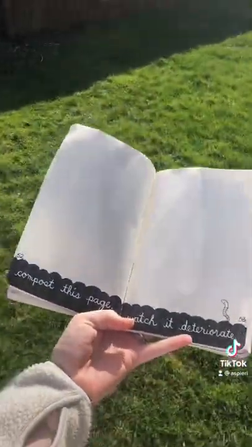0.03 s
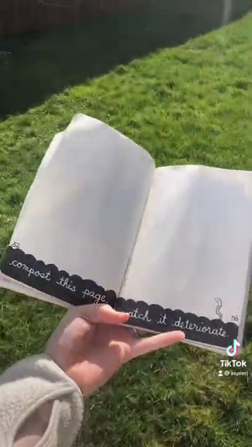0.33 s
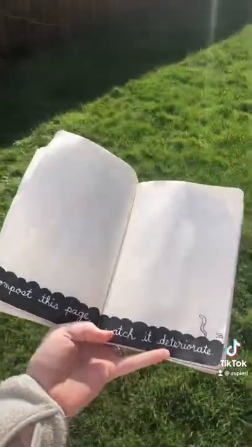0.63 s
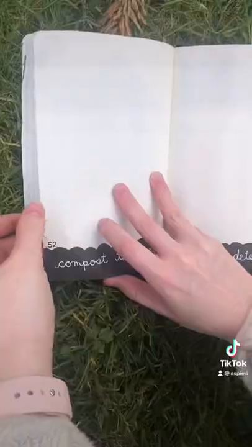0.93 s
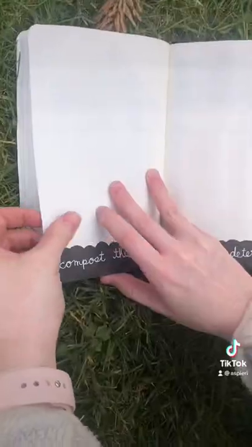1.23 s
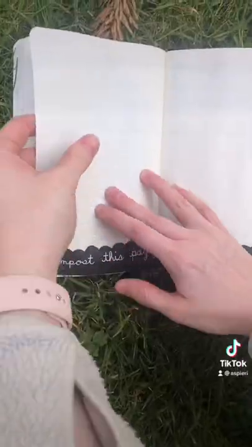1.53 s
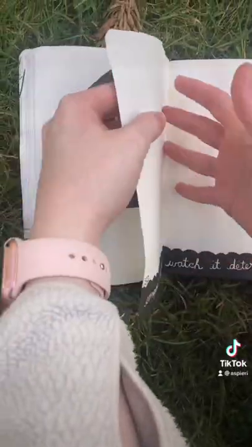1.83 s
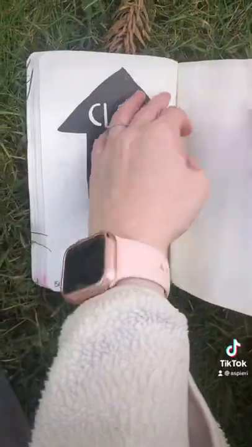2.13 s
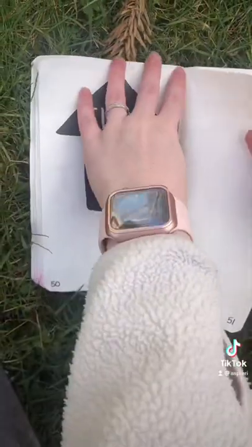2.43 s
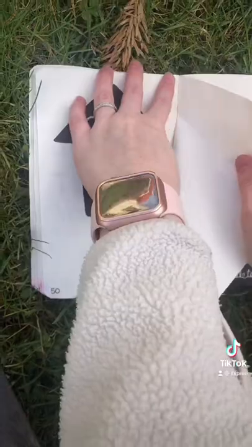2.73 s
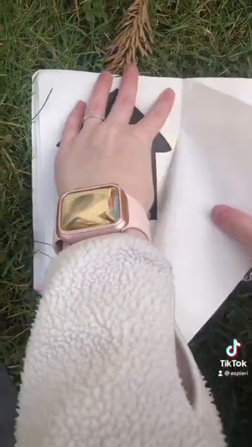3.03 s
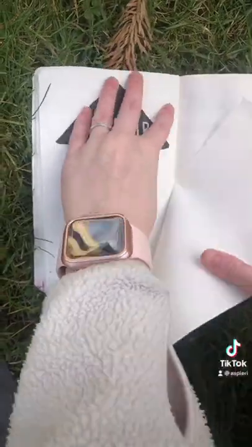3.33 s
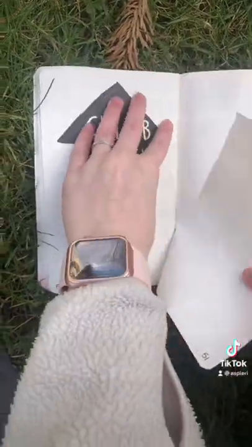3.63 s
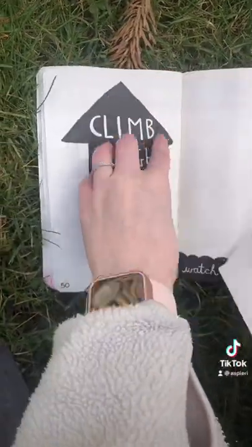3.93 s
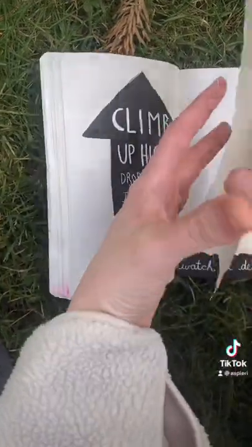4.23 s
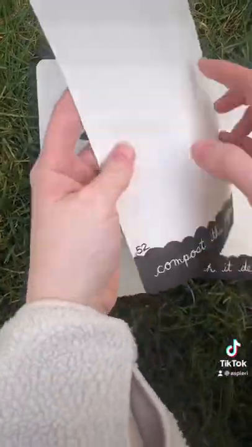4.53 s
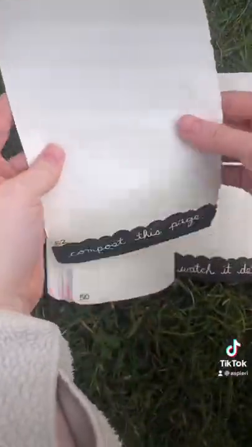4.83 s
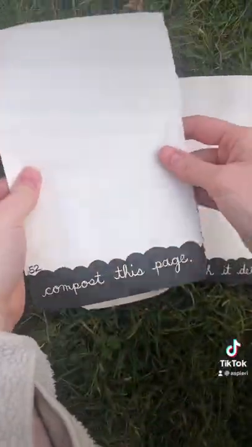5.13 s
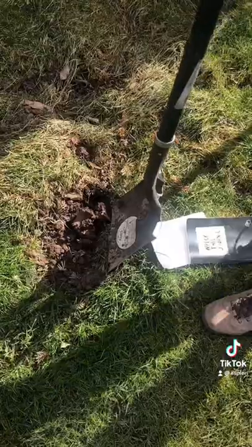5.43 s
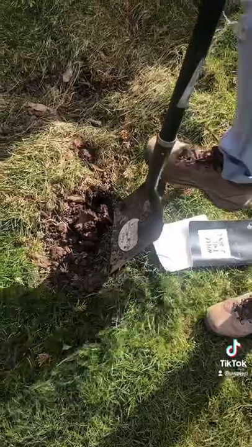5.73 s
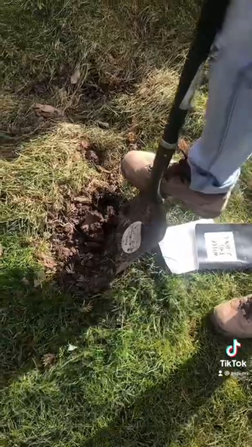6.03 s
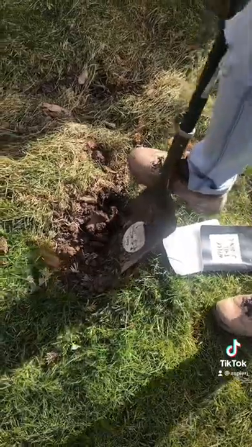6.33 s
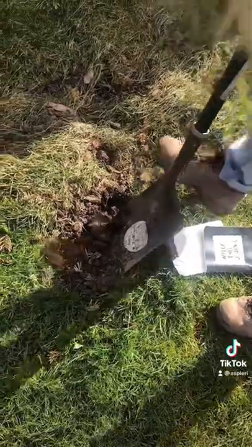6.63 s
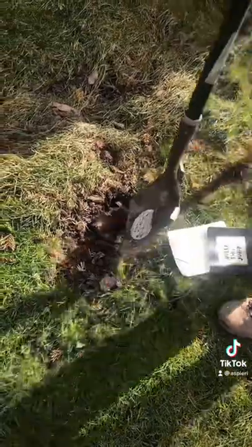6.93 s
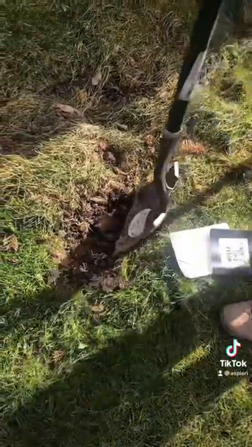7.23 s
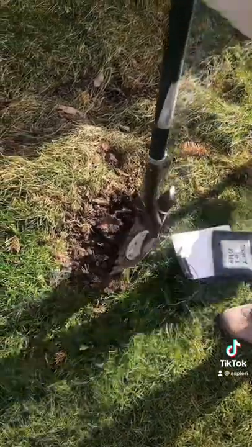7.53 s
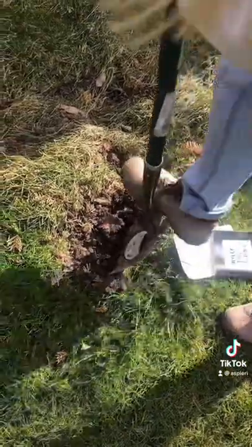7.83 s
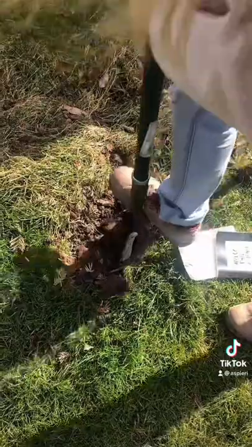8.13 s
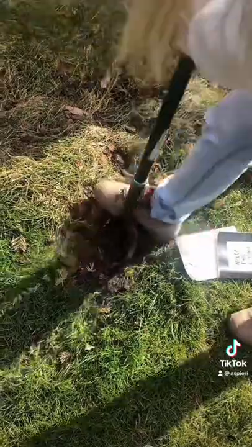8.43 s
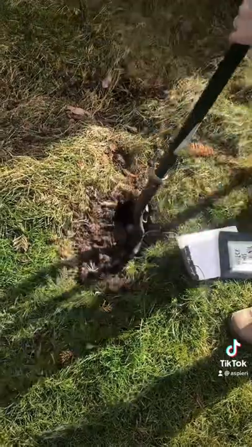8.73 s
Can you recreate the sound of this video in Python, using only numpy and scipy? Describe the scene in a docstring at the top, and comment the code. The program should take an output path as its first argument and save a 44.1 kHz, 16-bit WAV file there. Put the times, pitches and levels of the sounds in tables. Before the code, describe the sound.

Wind rumbles on the microphone over faint garden air, cutting out briefly just before 1 second. It returns with its strongest buffeting from about 1.1 to 2 seconds, while hands softly rub an open notebook and turn a page close by. Between 2.5 and 3.9 seconds the page is ripped out in three pulls, with small paper cracks under continuing gusts. The loose sheet then slides and flexes, snapping most sharply near 4.9 seconds. After a short silence at about 5.3 seconds, the wind is much quieter. A boot knocks on a spade near 5.8 seconds, followed by soft scuffs in grass, a very faint steel ring and snapping roots. Another knock comes at 7.8 seconds, and the blade crunches into the turf with crackling soil until about 8.4 seconds, as low gusts come back through to the end at 9 seconds.

```python
"""Wind buffets the microphone over faint garden air, in three passages parted by silence.
Hands rub an open notebook; a page is turned, ripped out in three pulls and flexed so that it snaps.
Friction makes the rasp, breaking fibres the rip, and sudden buckling the snaps. Then a boot treads
a spade into turf: impacts knock, the steel rings faintly, and soil and roots crackle as they fracture."""
import sys
import numpy as np
from scipy import signal
from scipy.fft import rfft, irfft
from scipy.io import wavfile
from scipy.ndimage import uniform_filter1d, minimum_filter1d, map_coordinates

SR = 44100
rng = np.random.default_rng(int(sys.argv[2]) if len(sys.argv) > 2 else 0)


def dump(signal):
    """Clip the signal to [-1, 1] and save it as 16-bit WAV at the path in sys.argv[1]."""
    limited = np.clip(np.atleast_2d(signal).T, -1, 1)
    pcm = np.round(limited * 32767).astype(np.int16)
    wavfile.write(sys.argv[1], SR, pcm)


N = 396018

# audible passages: start/s, end/s
PASSAGES = [(0, .869), (1.086, 5.234), (5.468, 9)]
# air flow underlying the gusts: t/s, level/dB
BREEZE_LEVELS = [(0, -43), (.85, -42), (1.2, -12), (2.05, -28.5), (3.1, -34), (5.2, -33), (5.47, -45),
                 (6.4, -52.5), (7.3, -43), (8.95, -41)]
# gusts: t/s, length/s, level/dB, relative level of small eddies/dB
WIND_GUSTS = [(0, 0.057, -34.5, -17.5), (0.227, 0.12, -19.5, -19), (.33, 0.3, -24.5, -14),
              (0.535, .13, -20, -18.5), (0.713, 0.15, -22.5, -28), (1.075, 0.12, -8.5, -20),
              (1.214, 0.24, -8.5, -13.5), (1.589, .25, -12.5, -14.5), (1.864, 0.081, -14.5, -17.5),
              (2.142, 0.035, -16, -27), (2.324, 0.33, -14, -20.5), (2.532, 0.41, -15.5, -23.5),
              (3.202, 0.081, -20.5, -21.5), (3.372, 0.039, -23.5, -20), (3.46, 0.037, -19, -23),
              (3.704, 0.039, -12, -25), (3.906, 0.052, -13, -17), (4.051, 0.042, -20.5, -21),
              (4.199, 0.2, -24.5, -39), (4.536, 0.043, -17.5, -28), (4.621, 0.048, -13, -23),
              (4.721, 0.21, -15, -21), (4.984, 0.24, -17, -23), (5.446, 0.089, -35, -28),
              (5.83, 0.2, -41, -32), (7.07, 0.07, -26.5, -48), (7.368, 0.31, -36, -42),
              (7.615, 0.087, -22.5, -39), (7.779, 0.026, -20.5, -39), (7.932, 0.021, -33.5, -31),
              (8.117, 0.046, -28.5, -25), (8.207, 0.15, -20, -34), (8.759, 0.045, -17, -24.5),
              (8.823, .15, -28, -24)]
# sudden puffs of air: t/s, level/dB, relative sputter/dB
AIR_PUFFS = [(1.086, -3.5, -21.5), (1.255, 0.5, -9), (1.299, -3.5, -23.5), (1.382, -5, -17.5),
             (1.417, -3, -14), (1.467, -2, -2), (1.572, -10.5, -12), (1.609, -4, -18), (1.76, -12, -12),
             (1.798, -4, -24), (1.919, -12, -7), (2.152, -11, -15.5), (2.295, -17.5, -20),
             (2.322, -8.5, -22), (3.715, -26, -3.5), (4.636, -6.5, -10.5), (4.799, -10, -24),
             (5.148, -20.5, -27)]
# hands and pages sliding over paper: t/s, length/s, rasp/dB, relative hiss/dB
PAPER_SLIDES = [(0.34, 0.14, -69, 4), (0.83, 0.067, -56, 0.5), (1.102, .14, -58.5, -4.5),
                (1.3, 0.37, -63, 3), (1.762, 0.021, -50, 3), (1.868, 0.14, -53, -6.5),
                (2.08, 0.077, -47.5, -9.5), (2.306, 0.041, -52, -4.5), (2.793, 0.21, -57, -7),
                (3.265, 0.12, -51, -2.5), (3.36, 0.19, -56, -4), (3.88, 0.38, -51.5, -3.5),
                (4.271, 0.093, -45, -4.5), (4.392, 0.19, -51, -1.5), (4.625, 0.018, -40.5, -1.5),
                (4.71, 0.29, -53.5, -0.5), (5.016, 0.12, -58.5, -4), (5.121, 0.045, -50, -2)]
# strokes of page on page: midpoint t/s, length/s, level/dB, f/Hz
PAGE_SWISHES = [(.43, 0.31, -61.5, 10550), (1.554, .14, -53, 2630), (1.99, 0.11, -54, 2300),
                (2.127, .08, -47, 1590), (4.043, 0.045, -53.5, 10900), (4.229, 0.1, -68, 2600),
                (4.467, .1, -59.5, 8040)]
# folds popping through: t/s, level/dB, relative crack/dB, f/Hz
SHEET_SNAPS = [(1.1895, -21.5, -11, 1030), (1.8644, -31.5, -18, 1110), (1.8944, -22.5, -47, 1070),
               (2.264, -20.5, -9, 1645), (2.364, -24, -11, 1500), (2.5482, -30, -4, 1050),
               (2.603, -30, 6, 1300), (2.6433, -30.5, -20, 1090), (2.668, -30, 0.5, 1050),
               (2.6898, -31.5, 8.5, 1380), (2.728, -26, -0.5, 1220), (2.7476, -28.5, 1, 1110),
               (2.86, -33.5, -24, 1310), (2.9145, -30, -23, 1010), (2.9777, -23, -28, 1070),
               (3.005, -32.5, -21, 1400), (3.071, -16, -28, 970), (3.0872, -26, -12, 1150),
               (3.2236, -32, -22, 1120), (3.4925, -22.5, -4.5, 1030), (3.7691, -25, -13.5, 1510),
               (3.8556, -22, -8.5, 2920), (3.8704, -26, -10.5, 3100), (4.2974, -24.5, 4, 1156),
               (4.325, -24, -14, 1420), (4.3585, -26, -18, 1270), (4.5357, -24.5, -16, 1810),
               (4.5438, -20, -8, 1550), (4.6098, -29.5, -8, 1130), (4.8108, -24, -34, 1530),
               (4.8607, -20.5, -27, 1030), (4.873, -25, -14.5, 1110), (4.8908, -11.5, -15, 1650),
               (4.9396, -16, -20, 1250), (4.9755, -19.5, -2, 1680), (5.018, -30, -24, 1030),
               (5.0318, -36, -2, 1820)]
# tugs tearing along the spine: t/s, length/s, sheet/dB, fibres/dB, fade over the tug/dB
PAGE_TUGS = [(2.537, 0.015, -52.5, -52, 2), (2.566, 0.054, -47.5, -49.5, 0.5), (2.649, 0.14, -46, -52.5, 3),
             (2.774, 0.08, -50.5, -61, 3.5), (3.034, .03, -54, -57.5, -3.5), (3.056, 0.17, -34, -40, 9.5),
             (3.505, 0.38, -40, -37, 0.5), (3.841, 0.027, -32.5, -36.5, -5)]
# boots and blade scuffing grass: t/s, length/s, starting level/dB
GRASS_SCUFFS = [(5.438, 0.025, -57.5), (5.796, 0.099, -57.5), (5.9, .15, -68.5), (6.046, 0.107, -57.5),
                (6.165, .36, -57), (6.583, 0.024, -62), (6.779, 0.088, -55), (6.909, 0.081, -55.5),
                (7.003, .37, -68), (7.102, 0.029, -56.5), (7.176, .02, -65), (7.373, 0.079, -54),
                (8.461, 0.047, -59.5), (8.724, .1, -53.5), (8.85, .12, -65.5)]
# modes of the steel blade: f/Hz, relative level/dB, T60/s
BLADE_MODES = [(1410, -3, .15), (2040, 2, .18), (2430, -1, .18), (2760, 0, 0.17)]
# crunch of the blade sinking into turf: t/s, level/dB
BLADE_THRUST = [(7.8, -51), (7.89, -46.5), (7.94, -52.5), (8.09, -44), (8.2, -38.5), (8.32, -42),
                (8.46, -59.5)]
# boot striking spade: t/s, level/dB, relative grit/dB
BOOT_KNOCKS = [(5.814, -34.5, -5), (5.856, -21, -10), (6.266, -36.5, -2.5), (6.609, -35.5, -1),
               (6.641, -33, 0), (7.789, -26.5, -6), (7.799, -23.5, -24)]
# roots and stalks breaking: t/s, level/dB, f/Hz
ROOT_SNAPS = [(6.0605, -37.5, 2690), (6.107, -37, 3100), (6.2158, -39.5, 2180), (6.317, -33, 5070),
              (6.3989, -31, 8750), (6.498, -37, 2050), (7.1365, -36, 1980), (7.1825, -36, 3840),
              (7.9043, -31, 5180), (7.94, -34.5, 2190), (7.9889, -31, 2580), (8.018, -31, 2630),
              (8.045, -28.5, 1410), (8.0594, -30.5, 1420), (8.158, -29.5, 2080), (8.218, -27, 2450),
              (8.277, -32, 2350), (8.3162, -25, 1490), (8.8067, -29.5, 1190)]

# spectra of moving air: f/Hz, relative density level/dB
BUFFET_SPECTRUM = [(12, -19.5), (25, -3.5), (48, 6), (100, -2.5), (170, -10), (260, -21.5), (400, -38.5),
                   (800, -82), (2000, -120)]
EDDY_SPECTRUM = [(100, -38), (200, 0), (290, 5.5), (450, -4), (700, -16), (1100, -29), (2000, -44.5),
                 (5000, -78.5)]
GARDEN_SPECTRUM = [(180, -25.5), (300, -3), (528, -5), (701, -5), (1660, -14.5), (1970, -13), (2520, -19.5),
                   (3240, -16.5), (7950, -26), (9880, -25), (13100, -30.5), (15000, -37), (16000, -62.5)]
PUSH_SPECTRUM = [(30, -9.5), (90, 2.5), (250, -3), (450, -14.5), (900, -33), (3000, -88)]
SPUTTER_SPECTRUM = [(150, -10.5), (450, 7), (750, -1), (1300, -13.5), (2500, -33.5), (6000, -73.5)]
# spectra of paper: f/Hz, relative density level/dB
RASP_SPECTRUM = [(300, -22.5), (700, 2), (1100, -2.5), (1900, -1.5), (2750, 2), (3600, -1), (5000, -2),
                 (8000, -24), (16000, -53.5)]
HISS_SPECTRUM = [(2000, -15.5), (4500, 8.5), (7000, 2), (9500, -2), (11500, -7), (13500, -19.5),
                 (16000, -32)]
CRINKLE_SPECTRUM = [(300, -19), (700, -4.5), (1150, 0), (2700, 1.5), (5000, -6), (9000, -17), (16000, -32)]
FLAP_SPECTRUM = [(200, -13.5), (600, 0.5), (900, -9.5), (1150, -0.5), (1400, -7), (1660, -8), (2100, -12.5),
                 (2600, -4.5), (3600, -15.5), (6000, -26), (12000, -49.5), (16000, -65.5)]
CRACK_SPECTRUM = [(600, -16), (2500, -3.5), (5000, 2.5), (9000, -7), (12000, -18.5), (16000, -26.5)]
TORN_SPECTRUM = [(150, 2), (400, 0), (650, 10), (1000, 1), (1400, -0.5), (1900, -1), (3000, 1), (4000, -10),
                 (7000, -34)]
FIBRE_SPECTRUM = [(1500, -46), (3000, -9.5), (4800, 0), (6500, 0), (7700, -0.5), (8800, -3), (10500, -4.5),
                  (12500, -9), (13700, -18), (16000, -30.5)]
# spectra of digging: f/Hz, relative density level/dB
SOIL_SPECTRUM = [(290, -17), (500, -10), (688, -7), (795, -6), (1530, -1.5), (1670, -5.5), (2460, -2.5),
                 (3700, -9), (4030, -6.5), (7000, -8.5), (10200, -10), (13100, -16.5), (16000, -33.5)]
THUD_SPECTRUM = [(50, 3), (150, 16), (400, -5.5), (900, -27.5), (1500, -30), (4000, -47.5)]
GRIT_SPECTRUM = [(400, -2.5), (1400, 6.5), (3000, 3), (5000, -8.5), (11000, -15.5), (16000, -27)]

GUST_ATTACK_S, GUST_T60_S, EDDY_T60_S, GUST_SAG_DB = 0.022, 0.2, 0.064, 0.53
BREEZE_EDDIES_DB, GARDEN_DB = -24.5, -59.5
SLIDE_ATTACK_S, SLIDE_T60_S, SLIDE_SAG_DB, SLIDE_CRINKLE_DB = 0.031, .16, 1.5, -7.5
GRIP_DB, GRIP_END_S = -66.5, 4.3  # fingers shifting on the book
TUG_ATTACK_S, TUG_T60_S, TUG_ARCH_DB, TUG_CRINKLE_DB = .02, 0.049, 2, -11
CREEP_BREAKS_PER_S, EXTRA_BREAKS_PER_S, RUNNING_DB = 740, 7500, -35  # extra rate at RUNNING_DB
SCUFF_ATTACK_S, SCUFF_T60_S, SCUFF_RISE_DB, BLADE_RING_DB = 0.029, 0.16, 3.5, -14.5


def amp(db):
    """Amplitude grows tenfold per 20 dB."""
    return 10 ** (np.asarray(db) / 20)


def unit(x):
    """Normalisation to rms 1."""
    return x / np.sqrt(np.mean(x ** 2) + 1e-20)


def peaked(x):
    """Normalisation to peak 1."""
    return x / (np.abs(x).max() + 1e-20)


def clock(seconds):
    """Uniform sampling of a duration, as t/s."""
    return np.arange(int(seconds * SR)) / SR


def add(track, s, sound):
    """Superposition of a sound on the track at time s."""
    part = track[round(s * SR):][:len(sound)]
    part += sound[:len(part)]


def wobble(rate):
    """Spline interpolation through random knots, rate a second."""
    knots = np.linspace(0, N * rate / SR, N // 20)
    smooth = map_coordinates(rng.standard_normal(int(knots[-1]) + 4), [knots])
    return np.interp(np.arange(N) * rate / SR, knots, smooth)


def curve(rows):
    """Interpolation of (t/s, level/dB) points as a gain, silent beyond them."""
    s, db = np.transpose(rows)
    t = np.arange(N) / SR
    inside = np.interp(t, [s[0] - .012, s[0], s[-1], s[-1] + .012], [0, 1, 1, 0])
    return amp(np.interp(t, s, db)) * inside


def swells(rows, attack, t60, arch_db=0):
    """Incoherent sounds add in power: the joint gain of (t/s, length/s, level/dB, fade/dB) gestures."""
    power = np.zeros(N)
    for s, length, db, fade_db in rows:
        t = clock(length + t60)
        progress = np.minimum(t / length, 1)
        hold_db = db - fade_db * progress + arch_db * np.sin(np.pi * progress)
        decay_db = 60 * np.maximum(t - length, 0) / t60
        rise = np.sin(np.pi / 2 * np.minimum(t / attack, 1)) ** 2
        add(power, max(s, 0), (rise * amp(hold_db - decay_db)) ** 2)
    return np.sqrt(power)


def colour(x, points, size=8192):
    """Minimum-phase filtering through (f/Hz, level/dB) points, to rms 1."""
    hz, db = np.transpose(points)
    log_hz = np.log(np.fft.rfftfreq(size, 1 / SR) + 1)
    cepstrum = irfft(np.log(amp(np.interp(log_hz, np.log(hz), db))))
    cepstrum[1:size // 2] *= 2
    cepstrum[size // 2 + 1:] = 0
    response = irfft(np.exp(rfft(cepstrum)))
    return unit(signal.oaconvolve(x, response)[:len(x)])


def steady(x, seconds):
    """Division by the running rms evens out slow swells and keeps the fine grain."""
    power = uniform_filter1d(x * x, max(int(seconds * SR), 2))
    return x / np.sqrt(np.abs(power) + 1e-9)


def drifting(x, depth_db):
    """Resonances come and go as the sounding surface changes shape."""
    spectra = signal.stft(x, nperseg=512)[2]
    field = uniform_filter1d(rng.standard_normal(spectra.shape), size=3, axis=0)
    field = uniform_filter1d(field, size=24, axis=1)
    return unit(signal.istft(spectra * amp(depth_db * unit(field)), nperseg=512)[1][:N])


def grains(rate, spread_db, clump_db, clump_rate):
    """Shot noise: random impulses, rate a second, swelling in clumps."""
    sizes = amp(spread_db * np.clip(rng.standard_normal(N), -2, 2)) * rng.choice([-1, 1], N)
    arrivals = rng.random(N) < rate / SR
    return unit(arrivals * sizes * amp(clump_db * wobble(clump_rate)))


def burst(t, t60, spectrum):
    """Exponential decay of coloured noise, peak 1."""
    return peaked(colour(rng.standard_normal(len(t)) * amp(-60 * t / t60), spectrum))


def bending_wave(t, high_hz, low_hz, fall, t60):
    """Dispersion: in a thin plate high notes travel fastest, so a blow arrives as a falling chirp."""
    cycles = low_hz * t + (high_hz - low_hz) * fall * (1 - np.exp(-t / fall))
    onset = 1 - np.exp(-t * high_hz)
    return peaked(np.sin(2 * np.pi * cycles) * amp(-60 * t / t60) * onset)


def wind():
    """Turbulence: large eddies shake the diaphragm; small ones sputter on its strongest swings."""
    gusts = [(s, length, db, GUST_SAG_DB) for s, length, db, _ in WIND_GUSTS]
    whirls = [(s, length, db + eddy_db, GUST_SAG_DB) for s, length, db, eddy_db in WIND_GUSTS]
    breeze = curve(BREEZE_LEVELS)
    buffet_gain = np.hypot(breeze, swells(gusts, GUST_ATTACK_S, GUST_T60_S))
    eddy_gain = np.hypot(amp(BREEZE_EDDIES_DB) * breeze, swells(whirls, GUST_ATTACK_S, EDDY_T60_S))
    swing = steady(colour(rng.standard_normal(N), BUFFET_SPECTRUM), seconds=.035)
    packets = unit(amp(2.3 * wobble(32)))  # eddies arrive in groups
    vortices = grains(rate=450, spread_db=2, clump_db=4, clump_rate=90) * (0.4 + np.abs(swing))
    flutter = steady(colour(vortices, EDDY_SPECTRUM), seconds=0.068)
    out = packets * (buffet_gain * swing + eddy_gain * flutter)
    t = clock(.1)
    for s, db, sputter_db in AIR_PUFFS:
        push = burst(t, t60=0.069, spectrum=PUSH_SPECTRUM)
        sputter = burst(t, t60=0.03, spectrum=SPUTTER_SPECTRUM)
        add(out, s, amp(db) * (push + amp(sputter_db) * sputter))
    return out


def garden_air():
    """Ambient noise: a faint broadband wash, drifting slowly in level."""
    drift = amp(1.4 * wobble(2.5))
    return amp(GARDEN_DB) * drift * colour(rng.standard_normal(N), GARDEN_SPECTRUM)


def paper_sliding():
    """Friction of skin and paper on paper: the sheet rasps, its surface hisses, quick strokes swish."""
    rasps = [(s, length, db, SLIDE_SAG_DB) for s, length, db, _ in PAPER_SLIDES]
    hisses = [(s, length, db + hiss_db, SLIDE_SAG_DB) for s, length, db, hiss_db in PAPER_SLIDES]
    grip = amp(GRIP_DB) * (np.arange(N) / SR < GRIP_END_S)
    rasp_gain = np.hypot(grip, swells(rasps, SLIDE_ATTACK_S, SLIDE_T60_S))
    hiss_gain = np.hypot(grip, swells(hisses, SLIDE_ATTACK_S, SLIDE_T60_S))
    rub = steady(grains(rate=6900, spread_db=0, clump_db=5.5, clump_rate=52), seconds=0.028)
    rub = drifting(rub, depth_db=2.2)
    rasp = colour(rub, RASP_SPECTRUM) + amp(SLIDE_CRINKLE_DB) * crinkles()
    out = rasp_gain * rasp + hiss_gain * colour(rub, HISS_SPECTRUM)
    for s, length, db, hz in PAGE_SWISHES:
        swell = np.hanning(len(clock(length)))
        band = [(hz / 4, -32), (hz * 0.79, -13), (hz, 0), (hz * 1.3, -14), (hz * 4, -35)]
        stroke = colour(rng.standard_normal(len(swell)), band)
        add(out, s - length / 2, amp(db) * swell * stroke)
    return out


def crinkles():
    """Local buckling: tiny creases in a moving sheet give way as sparse ticks, rms 1."""
    return colour(grains(rate=55, spread_db=8, clump_db=2.5, clump_rate=14), CRINKLE_SPECTRUM)


def sheet_buckling():
    """Snap-through of a fold gives a dry crack, a bending wave and a flap of the whole sheet."""
    out, t = np.zeros(N), clock(.07)
    for s, db, crack_db, hz in SHEET_SNAPS:
        pop = bending_wave(t, high_hz=hz * 3.1, low_hz=hz * 0.94, fall=0.00045, t60=0.015)
        flap = burst(t, t60=0.035, spectrum=FLAP_SPECTRUM)
        crack = burst(t, t60=0.0067, spectrum=CRACK_SPECTRUM)
        add(out, s, amp(db) * (amp(-3.5) * (pop + flap) + amp(crack_db) * crack))
    return out


def page_tearing():
    """Fracture: fibres break faster in a hard tug, and the shaken sheet radiates the lower rasp."""
    sheet_tugs = [(s, length, db, fade_db) for s, length, db, _, fade_db in PAGE_TUGS]
    fibre_tugs = [(s, length, db, fade_db) for s, length, _, db, fade_db in PAGE_TUGS]
    sheet_gain = swells(sheet_tugs, TUG_ATTACK_S, TUG_T60_S)
    fibre_gain = swells(fibre_tugs, TUG_ATTACK_S, TUG_T60_S, TUG_ARCH_DB)
    rate = CREEP_BREAKS_PER_S + EXTRA_BREAKS_PER_S * fibre_gain / amp(RUNNING_DB)
    breaks = grains(rate, spread_db=4.5, clump_db=2.4, clump_rate=200)
    breaks = drifting(steady(breaks, seconds=.03), depth_db=1.6)
    breaks *= unit(amp(1.6 * wobble(65)))  # the tear catches and runs on
    rasp = colour(breaks, TORN_SPECTRUM) + amp(TUG_CRINKLE_DB) * crinkles()
    return sheet_gain * rasp + fibre_gain * colour(breaks, FIBRE_SPECTRUM)


def spade_scraping():
    """Granular friction: soil crunches along the blade; surface scuffs also excite the steel's modes."""
    scuffs = [(s, length, db, -SCUFF_RISE_DB) for s, length, db in GRASS_SCUFFS]
    scuff_gain = swells(scuffs, SCUFF_ATTACK_S, SCUFF_T60_S)
    crumbs = steady(grains(rate=2200, spread_db=5, clump_db=2, clump_rate=130), seconds=.04)
    crunch = colour(drifting(crumbs, depth_db=3.3), SOIL_SPECTRUM)
    t = clock(.4)
    steel = sum(amp(db - 60 * t / t60) * np.sin(2 * np.pi * hz * t) for hz, db, t60 in BLADE_MODES)
    ring = signal.oaconvolve(scuff_gain * crumbs, steel / np.linalg.norm(steel))[:N]
    return np.hypot(scuff_gain, curve(BLADE_THRUST)) * crunch + amp(BLADE_RING_DB) * ring


def boot_knocks():
    """Impact on the spade's tread: a thud, grit and a bending wave that the earth quickly damps."""
    out, t = np.zeros(N), clock(.09)
    for s, db, grit_db in BOOT_KNOCKS:
        blade = bending_wave(t, high_hz=1272, low_hz=205, fall=0.00438, t60=0.081)
        thud = burst(t, t60=0.11, spectrum=THUD_SPECTRUM)
        grit = burst(t, t60=0.06, spectrum=GRIT_SPECTRUM)
        add(out, s, amp(db) * (amp(-7.5) * blade + amp(-9) * thud + amp(grit_db) * grit))
    return out


def roots_snapping():
    """Fracture of single roots and stalks, each snap filtered by the turf."""
    out, t = np.zeros(N), clock(.09)
    for s, db, hz in ROOT_SNAPS:
        snap = burst(t, t60=0.019, spectrum=[(hz / 5, -14), (hz, 0), (hz * 5, -10)])
        add(out, s, amp(db) * peaked(colour(snap, SOIL_SPECTRUM)))
    return out


def scene():
    """Superposition: the pressures of all sources add at one microphone."""
    air = wind() + garden_air()
    paper = paper_sliding() + sheet_buckling() + page_tearing()
    digging = spade_scraping() + boot_knocks() + roots_snapping()
    return (air + paper + digging)[None]


def record(dry):
    """Limiting holds the strongest gusts, gating parts the passages, and a low-pass cuts the top."""
    ceiling, top_hz = .93, 16000
    t = np.arange(N) / SR
    gate = sum((t >= start) * np.clip((end - t) / .002, 0, 1) for start, end in PASSAGES)
    peaks = -minimum_filter1d(-np.abs(dry), size=221)
    limiter = uniform_filter1d(ceiling / np.maximum(peaks, ceiling), size=221)
    passband = np.fft.rfftfreq(N, 1 / SR) < top_hz
    return irfft(rfft(dry * limiter * gate) * passband, N)


dry = scene()
out = record(dry)
dump(out)
```